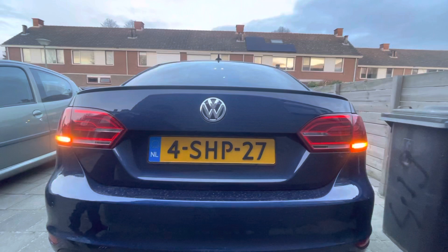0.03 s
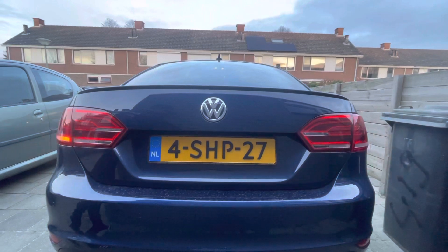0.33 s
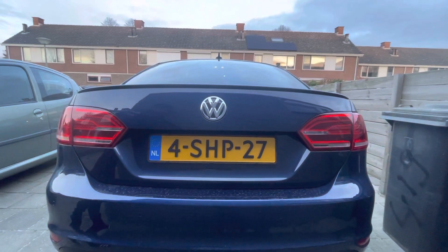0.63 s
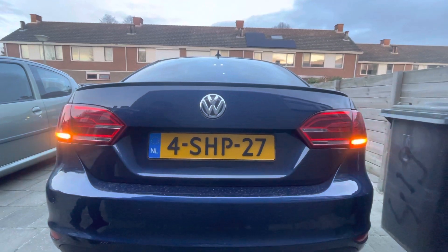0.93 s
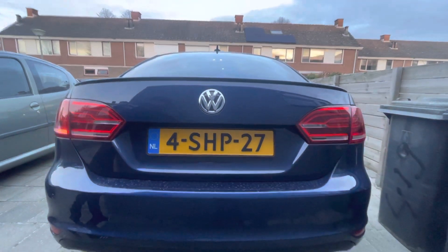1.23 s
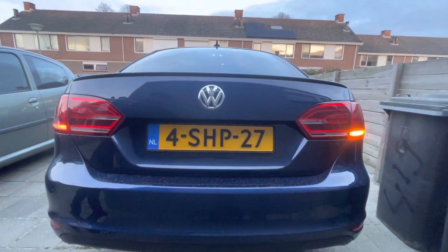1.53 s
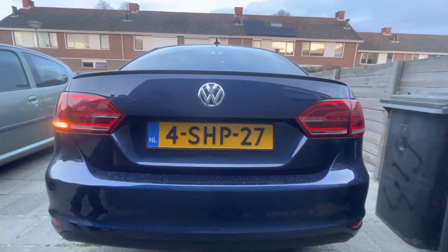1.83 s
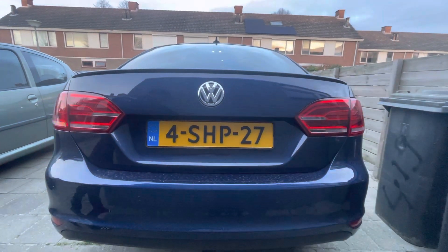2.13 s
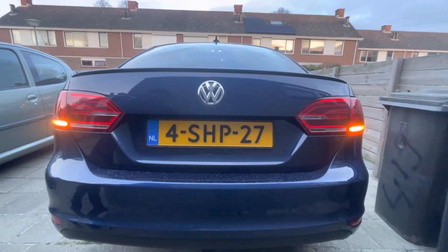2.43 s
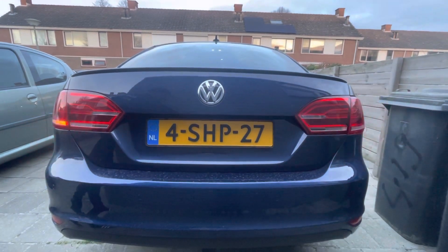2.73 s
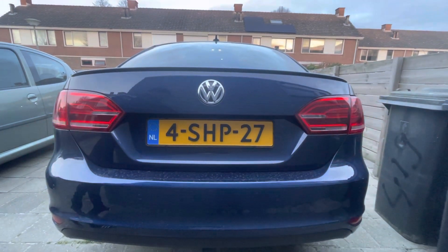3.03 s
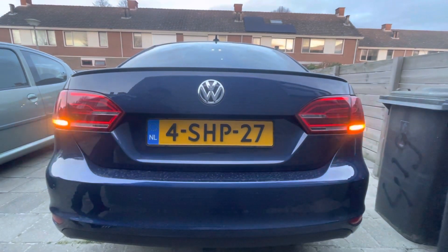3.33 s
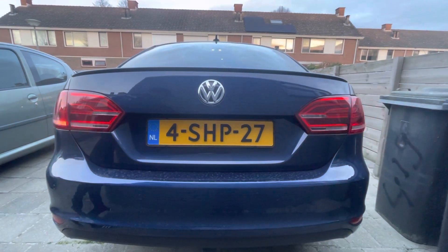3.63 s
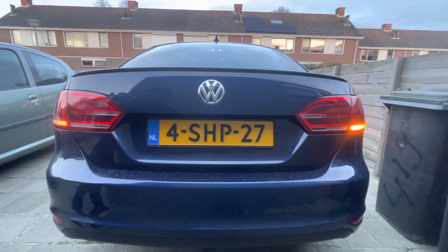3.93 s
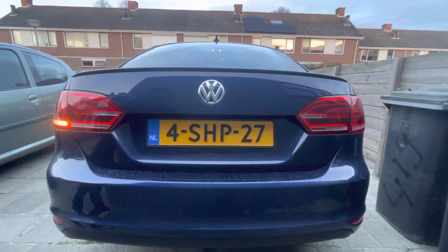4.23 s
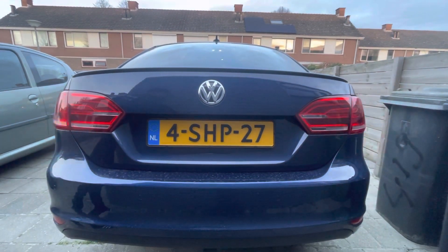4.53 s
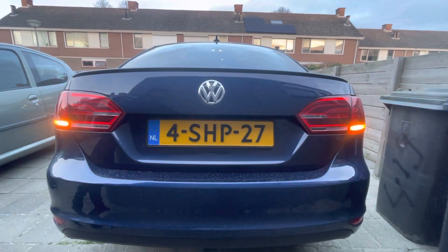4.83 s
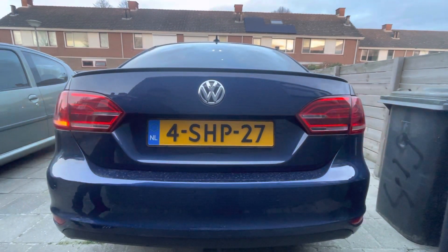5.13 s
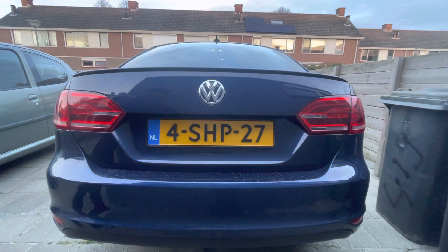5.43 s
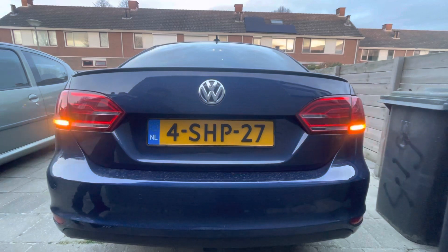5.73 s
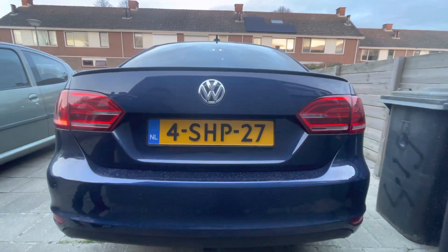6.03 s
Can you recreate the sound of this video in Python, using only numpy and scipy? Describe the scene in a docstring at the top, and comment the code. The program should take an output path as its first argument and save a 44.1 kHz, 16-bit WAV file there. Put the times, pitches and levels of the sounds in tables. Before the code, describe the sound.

Distant traffic rumbles and hums steadily behind a quiet residential street. A nearby bird whistles two notes, then a blackbird sings soft fluting phrases while small birds twitter faintly. Past the middle, jackdaws burst into short, rough overlapping calls that thin out to single ones, with a faint tick or two. The whistling bird and the blackbird return at the end. The birds echo lightly off the houses, heard in stereo.

```python
"""A quiet residential street, with far traffic rumbling and humming behind the houses throughout.
First a near bird whistles two notes; then a blackbird flutes and small birds twitter, all in
frequency-modulated tones. A few faint ticks sound. Past the middle, jackdaws call all at once, then
singly, their throats filtering a rough harmonic voice. Last, the whistler and the blackbird return.
House fronts reflect the birds; two small microphone ports hear it all, the right one first."""
import sys
import numpy as np
from scipy import signal
from scipy.fft import rfft, irfft, next_fast_len
from scipy.io import wavfile

SR = 44100
rng = np.random.default_rng(int(sys.argv[2]) if len(sys.argv) > 2 else 0)


def int16_out(signal):
    """Quantize to a 16-bit WAV file."""
    q = np.round(np.clip(np.atleast_2d(signal).T, -1, 1) * 32767)
    wavfile.write(sys.argv[1], SR, q.astype(np.int16))


N = 268128

# Levels in the tables are relative: later gains scale them.
# blackbird notes: (time [s], length [s], first pitch [Hz], held pitch [Hz], last pitch [Hz], level [dB])
BLACKBIRD_NOTES = [(0.676, 0.13, 2020, 1800, 2050, -48.5), (1.422, 0.059, 1730, 2025, 2170, -55.5),
                   (1.645, 0.056, 1523, 1720, 2110, -53.5), (1.685, .165, 2110, 2105, 2107, -53.5),
                   (1.904, 0.1, 1980, 1640, 1610, -54), (2.14, 0.042, 2620, 2475, 2250, -51.5),
                   (2.188, 0.08, 2300, 2157, 2410, -53), (2.274, 0.054, 2410, 2460, 2470, -55),
                   (2.782, .125, 1672, 1984, 1824, -50), (2.911, 0.059, 2790, 2697, 2550, -53),
                   (3.072, 0.07, 2026, 2217, 2100, -53), (3.15, 0.054, 2243, 2194, 2140, -51.5),
                   (5.909, 0.18, 1886, 2082, 2175, -51.5)]
# the blackbird's buzzy accent: (time [s], length [s], middle pitch [Hz], level [dB], swing [Hz])
BLACKBIRD_BUZZES = [(2.945, 0.078, 2680, -51.5, 216)]
# jackdaw calls: (time [s], length [s], first pitch [Hz], last pitch [ratio], level [dB], roughness [0-1])
JACKDAW_CALLS = [(3.681, 0.049, 1160, 0.86, -66.5, 0.47), (3.822, 0.044, 1258, 0.6, -65.5, 0.37),
                 (3.847, 0.067, 1184, 0.84, -61, 0.46), (3.885, 0.075, 880, .8, -58.5, 0.47),
                 (3.942, 0.1, 1086, 0.86, -64, 0.68), (3.999, 0.063, 1359, 0.69, -54.5, 0.38),
                 (4.022, .06, 1069, 0.64, -54, 0.51), (4.056, 0.065, 820, 0.8, -55, 0.47),
                 (4.095, 0.055, 830, 1.35, -58, 0.22), (4.112, .04, 1342, .9, -57, 0.38),
                 (4.133, .075, 930, 1.37, -59.5, 0.3), (4.167, .06, 824, 0.85, -55, 0.6),
                 (4.192, 0.07, 1350, .75, -57, 0.44), (4.246, 0.057, 1096, 0.96, -59.5, 0.48),
                 (4.306, 0.041, 1040, .85, -63.5, 0.1), (4.372, 0.08, 1060, 0.54, -56.5, 0.48),
                 (4.494, 0.069, 1112, 0.71, -61.5, 0.24), (4.581, 0.075, 1029, 0.8, -63, 0.72),
                 (4.803, 0.05, 1150, 0.67, -56.5, 0.34), (4.896, 0.054, 1063, 0.75, -53.5, 0.39),
                 (5.144, .044, 1040, 0.8, -61, 0.36), (5.238, 0.058, 882, 0.9, -70, 0.15)]
# resonances of a jackdaw's throat: (frequency [Hz], gain [dB])
THROAT_RESPONSE = [(600, -51), (1050, -6), (1500, 18), (1900, 12), (2500, 8.5), (3200, -5.5), (3900, -8),
                   (4350, -8), (4750, 3), (5200, 6), (5900, -4.5), (6600, -9), (7300, -19), (8100, -17),
                   (11300, -20.5), (13000, -41)]
# the flock is shrill, the later single calls duller: (time [s], spectral tilt [dB/octave])
CALL_TILT = [(3.8, 2), (4.25, 2.5), (4.38, -2), (4.5, -6), (4.8, -1), (4.9, -4), (5.2, -9)]
# the near bird's first note: (time [s], length [s], held pitch [Hz], drop [Hz], level [dB])
HELD_NOTES = [(.052, 0.13, 2448, 590, -53.5), (5.335, .135, 2576, 746, -51)]
# its second note: (time [s], top pitch [Hz], resting pitch [Hz], level [dB])
FLICKED_NOTES = [(0.299, 2793, 2407, -48), (5.61, 2752, 2340, -51)]
# small birds' twitters: (time [s], length [s], middle pitch [Hz], slide [Hz], level [dB], swing [Hz])
SMALL_TWITTERS = [(0.55, 0.056, 6110, 203, -83, 25), (0.932, 0.15, 6330, 34, -77, 80),
                  (0.941, 0.16, 4500, -200, -79, 80), (1.022, 0.037, 3550, -2000, -69.5, 280),
                  (1.183, .033, 5020, -150, -79, 160), (1.49, 0.15, 5040, -200, -80, 10),
                  (3.374, .34, 2510, 239, -73.5, 110), (3.38, 0.29, 3020, 208, -80, 160),
                  (5.411, 0.026, 4830, -100, -78, 110)]
# their arched chirps: (time [s], length [s], top pitch [Hz], slide [Hz], level [dB])
SMALL_CHIRPS = [(0.564, 0.062, 4140, 0, -67.5), (1.063, 0.029, 3170, 2, -65),
                (1.112, 0.032, 2920, 549, -69), (1.168, 0.027, 2850, 603, -70),
                (1.208, .036, 2750, 403, -77)]
# small ticks: (time [s], ring frequency [Hz], level [dB], t60 [s])
TICK_RINGS = [(2.575, 5100, -82, 0.031), (2.625, 11410, -77.5, 0.067), (3.671, 3020, -56, 0.028),
              (4.145, 3300, -37, 0.004)]
# far engines passing: (loudest time [s], swell width [s], pitch [Hz], level [dB])
PASSING_ENGINES = [(.4, 0.65, 88.2, -61), (0.999, 0.71, 44.35, -51.5), (1.3, 0.59, 132.8, -68.5),
                   (3.702, 0.47, 86.26, -61), (3.899, 1.54, 77.9, -53), (5.049, 0.62, 161.3, -62.5),
                   (4.8, .25, 80, -55.5), (5.199, 0.82, 41.66, -57.5), (5.399, 0.49, 199.8, -70)]
# one engine revving up and down: (time [s], pitch [Hz], level [dB])
ENGINE_REVS = [(0.05, 55.4, -58), (0.5, 56.07, -46.5), (0.58, 54.02, -56), (1.48, 54.18, -46),
               (1.9, 49.23, -48.5), (2.29, 47.26, -54), (2.55, 50.86, -51.5), (2.91, 53.51, -42),
               (3.5, 46.26, -51.5), (4.06, 51.1, -40.5), (4.39, 45, -60), (4.8, 49, -58)]
# soft low thuds: (time [s], pitch [Hz], level [dB])
LOW_THUDS = [(0.255, 69, -38), (1.139, 91, -48.5), (5.32, 80.6, -40.5)]
# traffic rumble: (frequency [Hz], spectral density [dB])
RUMBLE_SPECTRUM = [(20, -27.5), (33, -37), (40, 1.5), (52, -1), (66, -4), (82, 0), (100, -9), (125, -16.5),
                   (180, -20), (260, -22.5), (500, -54), (1500, -71.5)]
# course of the rumble: (time [s], level [dB])
RUMBLE_LEVELS = [(0, -47.5), (.4, -45), (2.3, -50), (2.9, -48), (4.8, -48), (6.08, -51.5)]
# wash of far tyres and air: (frequency [Hz], spectral density [dB])
WASH_SPECTRUM = [(30, -7.5), (200, -5.5), (350, -1.5), (480, -1.5), (600, -2.5), (800, 1.5), (950, 4),
                 (1300, -2.5), (1900, -5.5), (2600, -21.5), (3500, -31.5), (5000, -31.5), (8500, -28.5),
                 (10000, -30.5), (12500, -43.5)]
# tyre roar: (frequency [Hz], spectral density [dB])
TYRE_SPECTRUM = [(150, -33), (330, -23.5), (450, 7), (540, -19), (650, -1.5), (780, -4.5), (950, 10.5),
                 (1080, -7.5), (1350, -17), (3000, -48)]
# cars on a far road: (loudest time [s], swell width [s], level [dB])
PASSING_CARS = [(2.9, 0.95, -64), (5.699, 0.92, -67)]
# likeness of the traffic noise at the two ports: (frequency [Hz], coherence [0-1])
COHERENCE = [(60, 0.93), (130, 1), (270, 0.68), (600, 0.23), (1200, 0.82), (2500, 0), (6000, 0.8),
             (12000, 0)]
# reverberation of the street: (frequency [Hz], t60 [s])
STREET_DECAY = [(500, .9), (2500, 1.0), (5000, .5), (10000, .25)]
# the jackdaws' duller reverberation: (frequency [Hz], t60 [s])
JACKDAW_DECAY = [(500, .9), (2100, .9), (2900, .36), (5000, .27), (10000, .2)]
# blurred echoes from house fronts: (delay [s], blur [s], level over the tail [dB])
HOUSE_FRONTS = [(0.024, 0.046, 1), (0.181, 0.046, 6)]
# reflections from walls beside the jackdaws: (delay [s], gain [dB])
WALL_ECHOES = [(.0075, -9), (.017, -10)]
# response of the microphone ports: (frequency [Hz], left gain [dB], right gain [dB])
PORT_RESPONSE = [(62, 3, 0.5), (204, 1.5, -1), (590, 2.5, 3), (1240, 1.5, -1), (2010, -0.5, -7.5),
                 (2500, 3.5, 0), (2850, 5.5, 0), (4450, 2.5, -1.5), (5180, 8, -6.5), (5400, -4.5, -5.5),
                 (6870, 6, -6), (7450, -4.5, -12.5), (8570, 3, -5.5), (9930, -11.5, -12.5),
                 (11500, -0.5, 0)]

BUZZ_HZ = 197  # rate of the pitch flutter in buzzes and twitters


def blackbird_note(s, length, first, held, last, db, slid_db_per_hz=-.0001):
    """Frequency glide: a fluted tone slides onto a pitch, holds it, and slides off."""
    u = np.linspace(0, 1, int(length * SR))
    glide = held + (first - held) * (1 - u) ** 3.5 + (last - held) * u ** 3.3
    return s, whistle(glide, db - 9 + slid_db_per_hz * np.maximum(held - glide, 0), taper=.51)


def blackbird_buzz(s, length, middle, db, swing, throb=.41, unevenness=.18):
    """Coupled frequency and amplitude modulation: a raspy whistle, loudest at the foot of each swing."""
    size = int(length * SR)
    rate = BUZZ_HZ * (1 + unevenness * wander(size, hz=150))
    flutter = sine(rate) * signal.windows.tukey(size, .5)
    return s, whistle(middle + swing * flutter, db, taper=.41) * (1 - throb * flutter)


def jackdaw(s, length, first, end_ratio, db, rough, jitter=.0674, usual_db=-58):
    """Source and filter: throat resonances shape jittery harmonics and breath into a sharp 'kyak'."""
    size = int(length * SR)
    glide = first * (1 + (end_ratio - 1) * np.linspace(0, 1, size) ** 1.5)
    cycles = np.cumsum(glide * (1 + jitter * rough * wander(size, hz=304))) / SR
    harmonics = sum(np.cos(2 * np.pi * k * cycles) for k in range(1, 13))
    harmonics *= 1 + rough * wander(size, hz=580)  # uneven pulses
    rasp = (1 + np.cos(2 * np.pi * cycles)) * rng.standard_normal(size)
    effort = signal.windows.tukey(size, .8) * gain_of(2 * wander(size, hz=113))
    voice = ((1 - rough) * unit_rms(harmonics) + .66 * rough ** 2 * unit_rms(rasp)) * effort
    # every bird has a slightly different build, and so different resonances
    hz = bins(size)
    own_db = 3 * np.interp(hz, np.linspace(0, SR / 2, 50), rng.uniform(-1, 1, 50))
    build = 1 + .023 * (2 * rng.random() - 1)
    # rougher and louder calls are brighter
    tilt = -9.5 + 14.3 * rough + .55 * (db - usual_db) + np.interp(s, *np.transpose(CALL_TILT))
    octaves = np.log2(np.maximum(hz, first) / first)
    throat_db = at_hz(THROAT_RESPONSE, hz * build) + own_db + tilt * octaves
    return s, gain_of(db) * unit_rms(irfft(rfft(voice) * gain_of(throat_db), size))


def held_note(s, length, hz, drop, db, wobble=.0077, fade_db=-15):
    """Power-law glide: a wobbling whistle stays level, then falls away and fades."""
    fall = np.linspace(0, 1, int(length * SR)) ** 4.5
    pitch = hz * (1 + wobble * wander(len(fall), hz=54)) - drop * fall
    return s, whistle(pitch, db + fade_db * np.sqrt(fall), taper=.18)


def flicked_note(s, top, rest, db, length=.16, rise_s=.023, sink_s=.034, scoop_hz=400):
    """Relaxation: a whistle scoops up, then sinks almost exponentially to its resting pitch, softening."""
    t = np.arange(int(length * SR)) / SR
    below = np.maximum(1 - t / rise_s, 0) ** 2
    sunk = 1 - np.exp(-(np.maximum(t - rise_s, 0) / sink_s) ** 1.1)
    hz = top - scoop_hz * below - (top - rest) * sunk
    return s, whistle(hz, db - 5 * (below + sunk) - 40 * t, taper=.22)


def whistle(hz, db, taper, waver=.0075, tremor_db=1.2):
    """Random modulation: a bird's nearly pure tone trembles about its pitch and level curves."""
    size = len(hz)
    tone = np.sqrt(2) * sine(hz * (1 + waver * wander(size, hz=120)))
    return tone * gain_of(db + tremor_db * wander(size, hz=29)) * signal.windows.tukey(size, taper)


def twitter(s, length, middle, slide, db, swing, arch=0, waver=.012, hoarseness=.8):
    """Modulation sidebands: the wider a small bird's pitch flutters, the more hoarsely it buzzes."""
    u = np.linspace(-.5, .5, int(length * SR))
    glide = middle * (1 - arch * abs(2 * u) ** 1.7) + slide * u
    jitter = (waver * glide + hoarseness * swing) * wander(len(u), hz=296)
    flutter = swing * np.sin(2 * np.pi * BUZZ_HZ * length * u)
    return s, gain_of(db) * unit_rms(sine(glide + jitter + flutter) * signal.windows.tukey(len(u), .5))


def chirp(s, length, top, slide, db):
    """Frequency sweep: a small bird's pitch rises and falls in a rounded arch."""
    return twitter(s, length, top, slide, db, swing=0, arch=.26)


def tick(s, hz, db, t60, rise_s=.00033, grit=.3):
    """Damped oscillation: a tiny, gritty knock rings and decays exponentially."""
    t = np.arange(SR // 10) / SR
    ring = np.sin(2 * np.pi * hz * t) + grit * wander(len(t), hz=7000)
    return s, gain_of(db - 60 * t / t60) * (1 - np.exp(-t / rise_s)) * ring


def passing_engine(s, swell, pitch, db, sag_per_s=.007, waver=.0061, throb_db=2):
    """A moving source: an engine's tone swells and fades while its pitch sags."""
    t = np.arange(N) / SR - s
    hz = pitch * (1 - sag_per_s * t + waver * wander(N, hz=10.8))
    level = gain_of(db + throb_db * wander(N, hz=.97)) * np.exp(-.5 * (t / swell) ** 2)
    return 0, level * np.sqrt(2) * sine(hz)


def revving_engine(revs, waver=.0043):
    """Periodic firing: the frequency of an engine's tone follows its speed."""
    s, pitch, db = np.transpose(revs)
    t = np.arange(s[0], s[-1], 1 / SR)
    hz = np.interp(t, s, pitch) * (1 + waver * wander(len(t), hz=5.1))
    level = gain_of(np.interp(t, s, db) - 2) * signal.windows.tukey(len(t), .15)
    return s[0], level * np.sqrt(2) * sine(hz)


def thud(s, hz, db, width_s=.024):
    """A wave packet: a few soft cycles of bass under a Gaussian envelope."""
    t = np.arange(-SR // 8, SR // 8) / SR
    return s + t[0], gain_of(db) * np.exp(-(t / width_s) ** 2) * np.cos(2 * np.pi * hz * t)


def traffic(wash_db=-60):
    """Superposed noise bands: low rumble, a swaying wash of tyres and air, and far cars going by."""
    t = np.arange(N) / SR
    rumble = far_noise(RUMBLE_SPECTRUM) * gain_of(np.interp(t, *np.transpose(RUMBLE_LEVELS)) - 1)
    wash = far_noise(WASH_SPECTRUM) * gain_of(wash_db + wander(N, hz=3.9))
    passing = sum(gain_of(db) * np.exp(-.5 * ((t - s) / swell) ** 2) for s, swell, db in PASSING_CARS)
    return rumble + wash + far_noise(TYRE_SPECTRUM) * passing


def far_noise(spectrum):
    """Partial coherence: coloured noise is alike at both ports in the bass, less so higher up."""
    hz = bins(N)
    left, independent = rfft(rng.standard_normal((2, N)))
    coherence = np.clip(at_hz(COHERENCE, hz), 0, 1)
    right = coherence * left + np.sqrt(1 - coherence ** 2) * independent
    return unit_rms(irfft(np.array([left, right]) * gain_of(at_hz(spectrum, hz)), N))


def near_walls(x):
    """Early reflections: close walls add weaker, delayed copies of a sound."""
    return x + sum(gain_of(db) * np.pad(x, (round(delay * SR), 0))[:N] for delay, db in WALL_ECHOES)


def street(x, tail_db, pan_left_db, decays=STREET_DECAY):
    """Reverberation: a scattered tail follows the direct sound and swells where a house front answers."""
    t, hz = np.arange(SR) / SR, bins(SR)
    scatter = rfft(rng.standard_normal((2, SR)))
    centres, t60s = np.transpose(decays)
    # each band dies at its own speed, the treble first
    bands = [irfft(scatter * at_hz(np.c_[centres, share], hz), SR) for share in np.eye(len(decays))]
    tail = sum(band * np.exp(-np.log(1000) * t / t60) for band, t60 in zip(bands, t60s))
    tail *= 1 + sum(gain_of(db) * np.exp(-((t - delay) / blur) ** 2) for delay, blur, db in HOUSE_FRONTS)
    # the tail's strength is set in the band where the birds sing
    song_band = (hz > 1500) & (hz < 3500)
    tail /= np.sqrt(np.mean(abs(rfft(tail)[:, song_band]) ** 2))
    direct = x * gain_of([[pan_left_db], [-pan_left_db]])
    return direct + gain_of(tail_db) * signal.fftconvolve(x[None], tail, axes=1)[:, :N]


def gain_of(db):
    """Decibels as an amplitude ratio."""
    return 10 ** (np.asarray(db) / 20)


def unit_rms(x):
    """Normalisation to rms 1."""
    return x / np.sqrt(np.mean(x ** 2) + 1e-20)


def at_hz(points, hz):
    """Interpolation of a table on a log-frequency axis."""
    f, value = np.transpose(points)
    return np.interp(np.log(hz + 1), np.log(f + 1), value)


def bins(size):
    """Frequencies of a discrete spectrum."""
    return np.fft.rfftfreq(size, 1 / SR)


def sine(hz):
    """An oscillator whose phase is the integral of its frequency."""
    return np.sin(2 * np.pi * np.cumsum(hz) / SR)


def wander(size, hz):
    """Low-pass noise of rms near 1, moving no faster than about hz."""
    padded = next_fast_len(size + SR)
    lowpass = np.exp(-np.minimum(bins(padded) / hz, 10) ** 2)
    return unit_rms(irfft(rfft(rng.standard_normal(padded)) * lowpass, padded))[:size]


def play(source, table):
    """Superposition: each row sounds at the start time its source returns."""
    mix = np.zeros(N)
    for row in table:
        s, sound = source(*row)
        part = mix[max(round(s * SR), 0):][:len(sound)]
        part += sound[:len(part)]
    return mix


def scene():
    """Superposition: birds and ticks reverberate in the street over far traffic."""
    engines = play(passing_engine, PASSING_ENGINES) + play(revving_engine, [[ENGINE_REVS]])
    thuds = play(thud, LOW_THUDS)
    blackbird = street(play(blackbird_note, BLACKBIRD_NOTES), tail_db=-3, pan_left_db=4) * gain_of(-6)
    accent = street(play(blackbird_buzz, BLACKBIRD_BUZZES), tail_db=-12, pan_left_db=1.5) * gain_of(-7.5)
    twitters = play(twitter, SMALL_TWITTERS) + play(chirp, SMALL_CHIRPS)
    small_birds = street(twitters, tail_db=-3.5, pan_left_db=1.5) * gain_of(-6)
    whistles = play(held_note, HELD_NOTES) + play(flicked_note, FLICKED_NOTES)
    whistler = street(whistles, tail_db=-3.5, pan_left_db=0) * gain_of(-7)
    calls = near_walls(play(jackdaw, JACKDAW_CALLS))
    jackdaws = street(calls, tail_db=-2, pan_left_db=.5, decays=JACKDAW_DECAY) * gain_of(-3)
    ticks = street(play(tick, TICK_RINGS), tail_db=-.5, pan_left_db=1.5)
    return blackbird + accent + jackdaws + whistler + small_birds + ticks + engines + thuds + traffic()


def record(dry, left_lag_s=.0005047, start_s=.0328, fade_s=.00041, cutoff_hz=12900):
    """Linear filtering: each port colours the sound, the left lags; then quick fades and a band limit."""
    t, hz, ports = np.arange(N) / SR, bins(N), np.array(PORT_RESPONSE)
    fades = np.clip(np.minimum(t - start_s, t[-1] - t) / fade_s, 0, 1)
    left = gain_of(at_hz(ports[:, [0, 1]], hz)) * np.exp(-2j * np.pi * hz * left_lag_s)
    right = gain_of(at_hz(ports[:, [0, 2]], hz))
    heard = irfft(rfft(dry) * np.array([left, right]), N) * fades
    lowpass = signal.firwin(511, cutoff_hz, window=("kaiser", 9), fs=SR)
    return signal.oaconvolve(heard, lowpass[None], "same")


dry = scene()
out = record(dry)
int16_out(out)
```